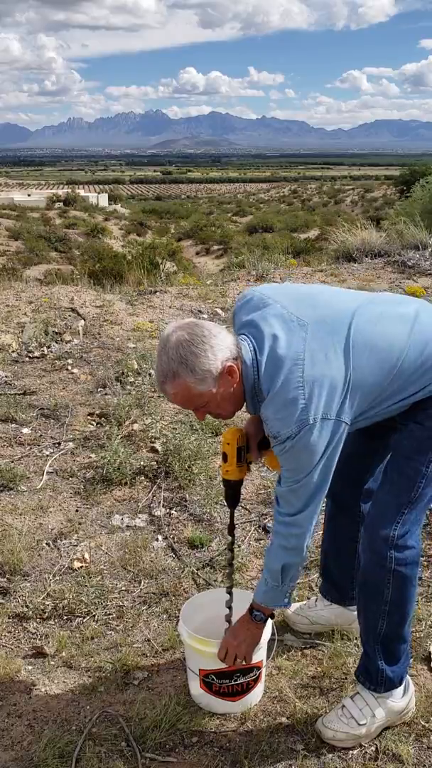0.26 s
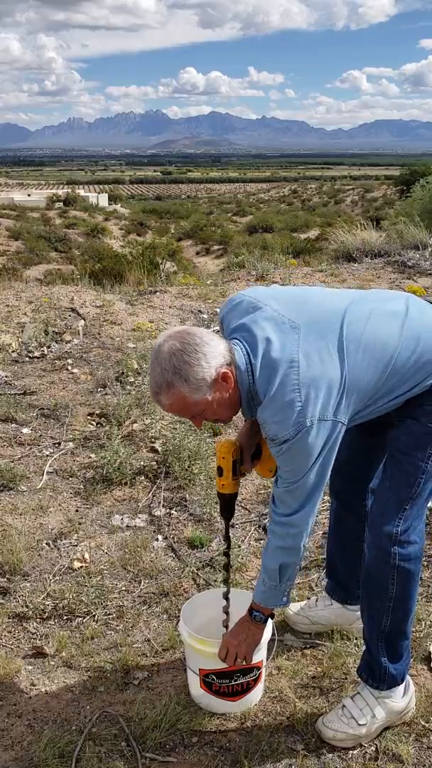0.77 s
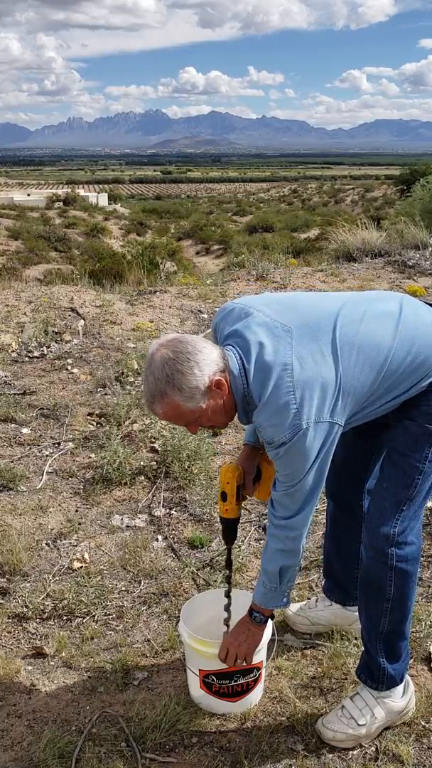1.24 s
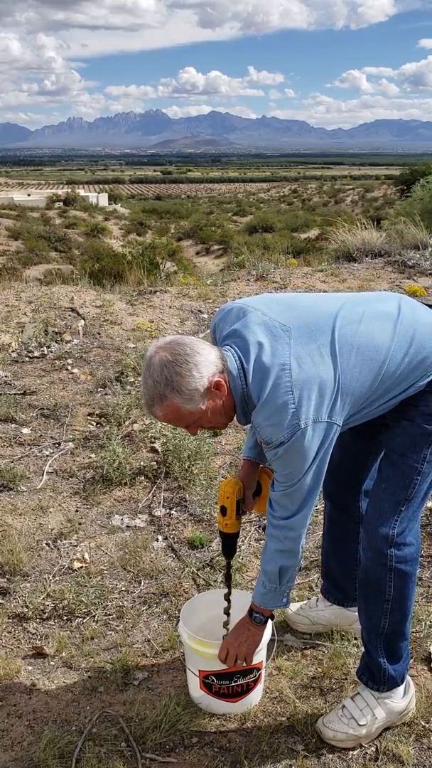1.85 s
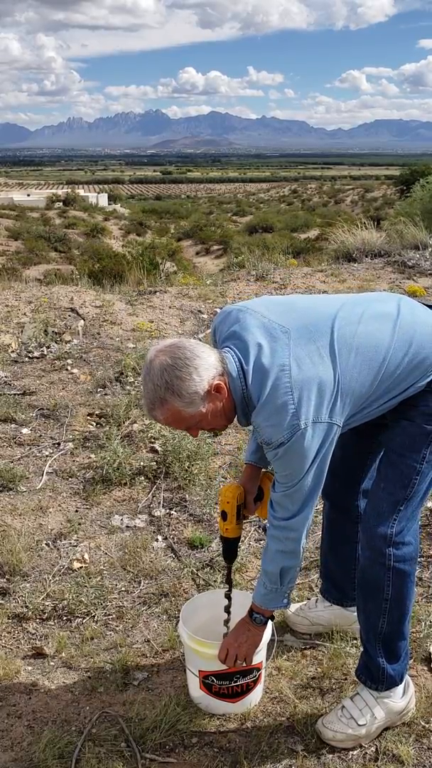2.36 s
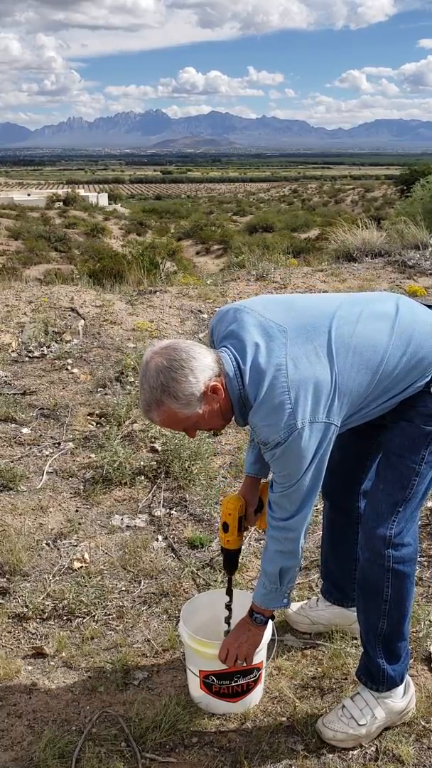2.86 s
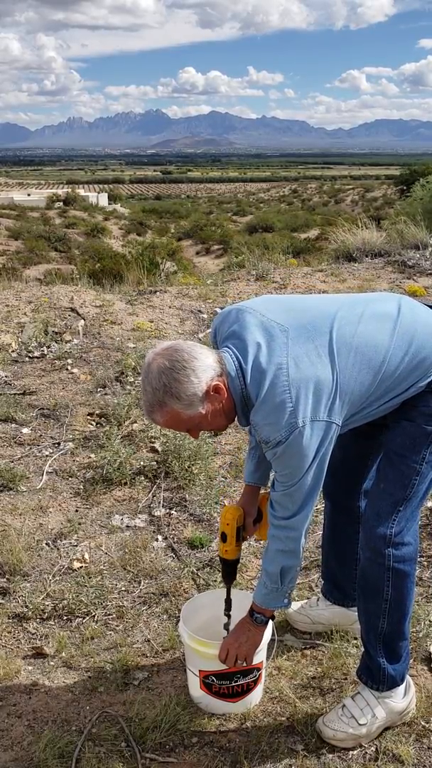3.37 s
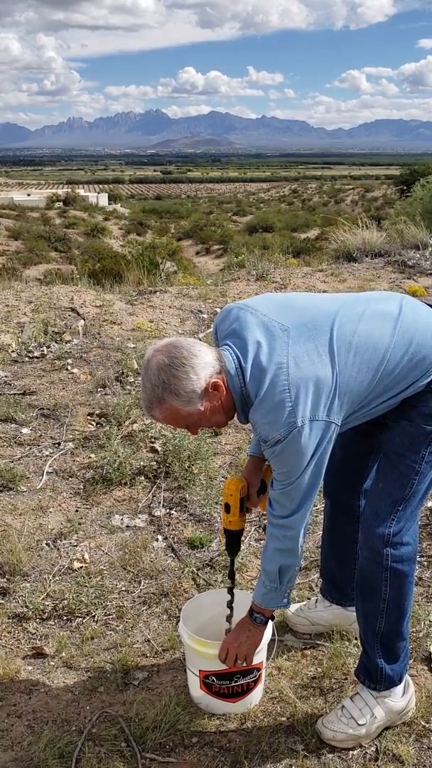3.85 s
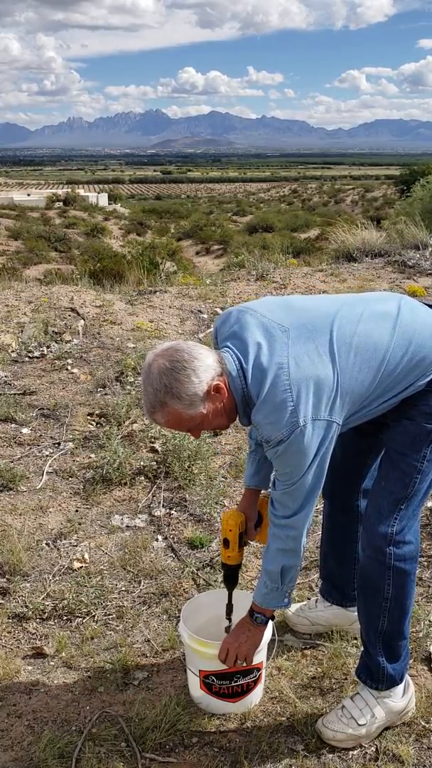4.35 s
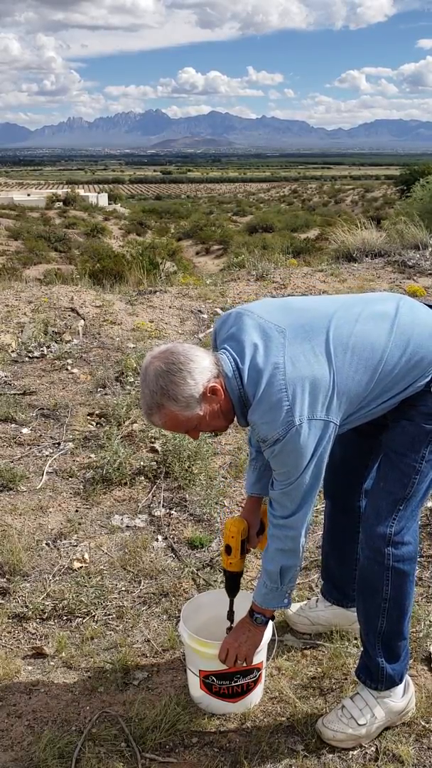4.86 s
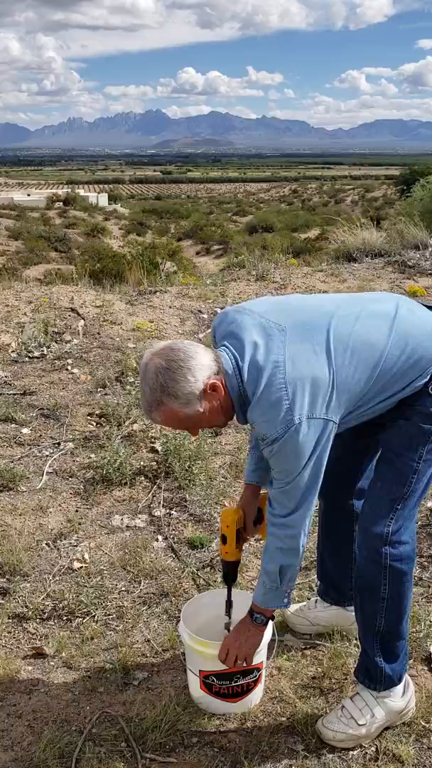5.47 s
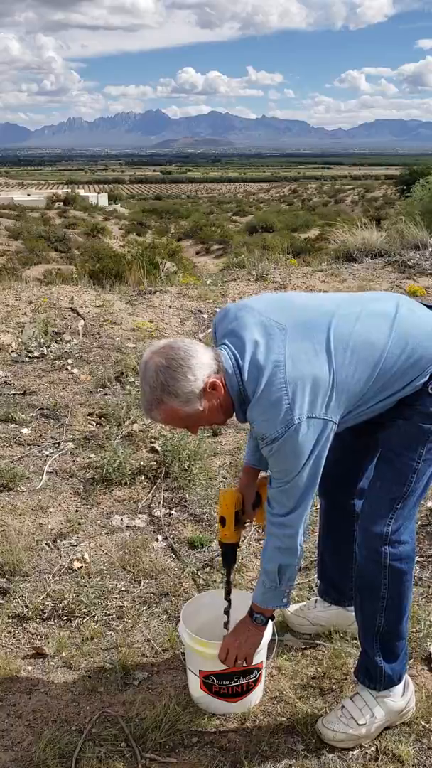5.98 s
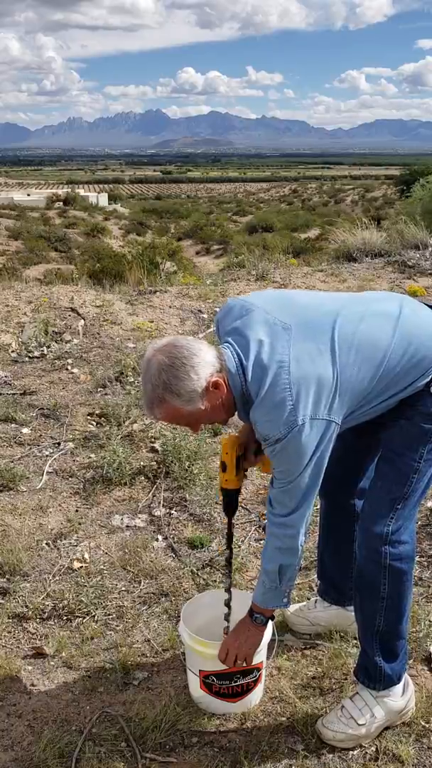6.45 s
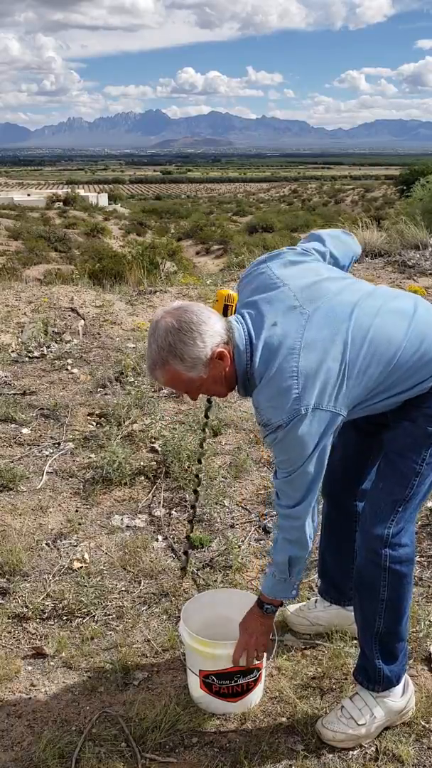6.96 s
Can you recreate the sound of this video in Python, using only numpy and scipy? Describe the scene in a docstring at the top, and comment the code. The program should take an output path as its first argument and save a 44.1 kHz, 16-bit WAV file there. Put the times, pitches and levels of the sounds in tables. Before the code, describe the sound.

A battery drill whines as its long bit scrapes and knocks in a plastic bucket, then stops, in light wind.

```python
"""A light wind and a few soft scrapes are heard first, then a battery drill hisses and whines up to speed.
It turns a long auger bit through a plastic bucket into dry soil, in an open field. The gear tones sag
under load; the flutes scrape and knock the bucket, whose shell rings in its normal modes, and grit pings
off the steel. A brake stops the chuck and the bit is drawn out, while wind buffets both microphone ports."""
import sys
import numpy as np
from scipy import signal
from scipy.fft import rfft, irfft, next_fast_len
from scipy.io import wavfile
from scipy.ndimage import uniform_filter1d, map_coordinates

SR = 44100
rng = np.random.default_rng(int(sys.argv[2]) if len(sys.argv) > 2 else 0)


def dump_mix(stems):
    """Bounce the given channels to the path in sys.argv[1] as a 16-bit WAV at rate SR."""
    frames = np.atleast_2d(stems).T  # one column per channel
    limited = np.clip(frames, -1, 1)  # hard clip at full scale
    pcm = np.round(limited * 32767).astype(np.int16)
    wavfile.write(sys.argv[1], SR, pcm)


N = 318402

# Levels in the tables are relative: the sources apply their own gains.
# far hiss of scrub: (frequency [Hz], spectral density [dB])
SCRUB_SPECTRUM = [(410, -45), (700, -6), (2010, -6), (2830, -2), (3570, -1), (5020, -5.5), (6860, -9.5),
                  (8340, -15.5), (12000, -15), (15800, -24)]
# strength of that hiss: (time [s], level [dB])
SCRUB_LEVEL = [(0, -62.5), (.6, -65), (6.3, -59.5), (7.22, -59)]
# buffeting in a soft breeze: (frequency [Hz], spectral density [dB])
BUFFET_SPECTRUM = [(15, -18), (40, -11), (90, -1.5), (200, -11), (400, -23.5), (700, -44), (1500, -82)]
# strength of the buffeting: (time [s], level [dB])
BUFFET_LEVEL = [(0, -50.5), (.19, -49), (.21, -38.5), (.27, -45), (.3, -47.5), (1.2, -53), (1.85, -39.5),
                (2.2, -42), (2.7, -40), (3.4, -45), (4.4, -46.5), (4.9, -41), (5.5, -51.5), (6.04, -50),
                (6.09, -35.5), (6.15, -48.5), (6.58, -43), (6.62, -35), (6.74, -38), (6.87, -46.5),
                (7.09, -47), (7.16, -42)]

# grit and stones striking the bit: (time [s], level [dB], frequency [Hz])
PINGS = [(1.7704, -18.5, 5560), (2.23, -13, 5280), (3.0727, -23, 5100), (3.8857, -9, 1770),
         (3.9613, -15, 4870), (4.172, -23, 5160), (6.4931, -33.5, 5200), (6.5605, -42, 5300),
         (6.5774, -39.5, 5130)]
# dry rasps of hand, bit and soil: (start [s], peak level [dB], length [ms])
RASPS = [(.122, -55, 75), (.168, -48, 47), (.244, -55, 33), (.378, -54, 16), (.4, -48, 7.9), (.6, -55, 9.8),
         (1.412, -23.5, 16), (6.05, -50, 88), (6.225, -51.5, 200), (6.335, -57, 28), (6.367, -43.5, 41),
         (6.41, -56.5, 130), (6.65, -56, 7.7)]
# colour of the rasps: (frequency [Hz], spectral density [dB])
RASP_SPECTRUM = [(240, -28), (400, -14), (2070, -7.5), (2820, -10.5), (3610, -10), (5060, -6.5),
                 (6180, -12), (7670, -11), (15800, -36.5)]
# trigger, a stone cracking, brake: (start [s], peak level [dB], length [ms])
CLACKS = [(.648, -34, 8.4), (1.444, -16, 11), (6.015, -18.5, 10.6), (6.028, -35, 16)]
# colour of the clacks: (frequency [Hz], spectral density [dB])
CLACK_SPECTRUM = [(300, -16.5), (1500, -10.5), (2800, -4.5), (4000, -5), (7600, -17), (15800, -22)]
# thin notes of the steel bit: (frequency [Hz], bandwidth [Hz], gain [dB])
BIT_MODES = [(6600, 120, -6.5), (7430, 80, 1.5), (7600, 80, -2)]

# air and brush noise of the motor: (frequency [Hz], spectral density [dB])
MOTOR_SPECTRUM = [(1180, -16), (2000, -5), (2340, -7.5), (2660, -5), (3300, -4.5), (3630, -2.5),
                  (3890, -1.5), (5180, -2.5), (6260, -12), (7450, -3.5), (9240, -13.5), (10400, -9),
                  (11400, -11), (12400, -8), (15800, -24)]
# lift of the motor's treble: (time [s], gain [dB])
MOTOR_TREBLE = [(.66, -21), (.69, -4.5), (1.3, -6.5), (1.7, -2), (3.7, 5.5), (3.85, -1), (4.1, 0.5),
                (4.18, 4.5), (5.15, 6.5), (5.4, 0), (5.5, 5.5), (5.8, 6), (6.02, 0.5)]
# gear mesh tone under varying load, at full throttle: (time [s], frequency [Hz], level [dB])
GEAR_MESH = [(.73, 3920, -46), (.765, 3920, -36), (.86, 3920, -39), (.95, 3900, -49), (1.26, 3770, -44),
             (1.36, 3850, -43), (1.6, 3604, -54), (1.8, 3680, -46), (2.06, 3795, -40), (2.22, 3900, -52),
             (2.4, 3895, -50), (2.54, 3770, -42), (2.66, 3825, -41), (2.72, 3735, -43), (3.05, 3780, -50),
             (3.3, 3722, -46), (3.82, 3815, -43), (4.14, 3976, -42), (4.21, 3800, -60), (4.26, 3700, -44),
             (4.34, 3850, -45), (4.7, 3850, -43), (4.88, 3775, -42), (5.1, 3850, -42), (5.36, 4023, -43),
             (5.58, 4048, -53), (5.65, 3930, -47), (5.76, 3990, -50), (5.84, 4025, -39), (5.95, 4025, -46)]
# tones either side of the mesh tone: (time [s], lower level [dB], upper level [dB])
GEAR_SIDEBANDS = [(.9, -60, -60), (1.1, -50, -44), (1.4, -52, -52), (1.8, -42, -49), (2.05, -52, -43),
                  (2.25, -54, -54), (2.45, -47, -41), (2.66, -50, -42), (2.74, -52, -52), (3.2, -45, -45),
                  (3.6, -49, -46), (3.85, -58, -56), (4.6, -54, -56), (4.95, -58, -45), (5.2, -60, -58)]
# weaker gear orders: (multiple of the mesh frequency [1], level against the full-speed mesh tone [dB])
GEAR_ORDERS = [(5 / 12, -8)]

# resonances of the bucket's shell: (frequency [Hz], bandwidth [Hz], gain [dB])
SHELL_MODES = [(310.6, 42, -1), (458, 172, 1), (681, 410, 1.5), (815, 133, 4), (1282, 50, -1),
               (1685, 162, 1), (1900, 202, -2.5), (3030, 80, -15.5)]
# soil grinding between catches: (time [s], level [dB])
GRIND_LEVEL = [(.81, -37.5), (1.15, -34.5), (2.75, -35), (3.3, -37), (4.6, -35.5), (5.8, -37.5),
               (6.17, -53)]
# the flutes catch the bucket: (start [s], peak level [dB], length [ms])
CATCHES = [(0.118,-32.5,14),(.166,-39.5,51),(.388,-48,32),(.47,-51,84),(.809,-33,24),(.855,-37,42),
           (.891,-25,23),(0.958,-17,25),(1,-23.5,51),(1.064,-24.5,60),(1.126,-16.5,33),(1.177,-17,31),(1.234,-17.5,23),
           (1.284,-22,40),(1.34,-19.5,50),(1.402,-15,22),(1.446,-20.5,46),(1.505,-13.5,13),(1.521,-12.5,25),
           (1.56,-22,50),(1.634,-20,10),(1.672,-17.5,48),(1.728,-23,80),(1.781,-20.5,63),(1.849,-15,40),
           (1.901,-18.5,46),(1.955,-23.5,16),(1.977,-27,38),(2.005,-13,24),(2.063,-14,12),(2.11,-17,23),
           (2.155,-25.5,33),(2.209,-17.5,52),(2.291,-20,19),(2.348,-19,42),(2.396,-27,99),(2.443,-22,23),
           (2.485,-16,45),(2.547,-24,73),(2.642,-22,30),(2.7,-15,20),(2.723,-16.5,56),(2.811,-17,30),
           (2.859,-17.5,47),(2.921,-18.5,17.5),(2.959,-23.5,54),(3.03,-14,18),(3.066,-19,28),(3.123,-15,21),(3.167,-24,30),
           (3.219,-21,19),(3.267,-20.5,24),(3.341,-26.5,30),(3.382,-22,47),(3.435,-23.5,65),(3.491,-18,28),
           (3.534,-18.5,36),(3.59,-25,41),(3.655,-28,21),(3.744,-23,48),(3.817,-22.5,35),(3.858,-24,20),(3.88,-15.5,25),
           (3.958,-18,30),(4.006,-21,12),(4.03,-24.5,25),(4.135,-22,43),(4.168,-20.5,38),(4.219,-24.5,18),
           (4.247,-23,26),(4.304,-17.5,19),(4.344,-20,30),(4.386,-20.5,54),(4.442,-30,110),
           (4.569,-24,23),(4.663,-22.5,21),(4.719,-19.5,35),(4.775,-22.5,12),(4.833,-23.5,42),
           (4.912,-22.5,21),(4.998,-25.5,32),(5.029,-27,29),(5.068,-30.5,16),(5.19,-18,21),
           (5.311,-25.5,11),(5.342,-20.5,23),(5.381,-18.5,18),(5.523,-21,19),(5.556,-18,19),(5.618,-23,16),
           (5.643,-23,19),(5.673,-17.5,15),(5.699,-27,28),(5.745,-24.5,13),(5.813,-23.5,15),
           (5.91,-32.5,32),(5.974,-31.5,21),(6.012,-34.5,78),(6.139,-41.5,9),(6.241,-33,17),(6.332,-27.5,30),(6.368,-20,39),
           (6.422,-30,20.3),(6.488,-36,42),(6.558,-39,40),(6.648,-38.5,22)]
# blows that sound the bucket's clearest note: (time of peak [s], peak level [dB], build-up [ms])
KNOCKS = [(0.131, -34, 2.3), (0.183, -47, 9.2), (0.817, -27, 4.1), (0.863, -27.5, 9.1), (0.9, -27, 6.9),
          (0.919, -24.5, 14), (0.973, -12.5, 6.5), (1.149, -15.5, 4.7), (1.195, -25.5, 11),
          (1.209, -16.5, 5), (1.268, -19, 5.7), (1.319, -20.5, 3.4), (1.411, -15, 4.2), (1.462, -19, 5.9),
          (1.49, -22, 16), (1.532, -8, 9), (1.676, -21.5, 1.4), (1.788, -29, 4), (1.817, -23, 11),
          (1.984, -20, 3.7), (2.022, -11, 6.6), (2.071, -20.5, 3.3), (2.131, -18.5, 5.9),
          (2.199, -20.5, 5.4), (2.238, -19, 3), (2.262, -17.5, 2.8), (2.363, -26.5, 5.3),
          (2.411, -16.5, 4.7), (2.46, -14.5, 6.2), (2.506, -15.5, 6.9), (2.553, -20.5, 4.4), (2.57, -16, 4),
          (2.702, -18, 6.9), (2.734, -11, 6), (2.763, -21, 6.3), (2.783, -19, 9.4), (2.869, -15.5, 1.8),
          (2.93, -22, 4.5), (2.974, -19, 2.4), (3.02, -20.5, 4.2), (3.041, -20, 4.4), (3.079, -24.5, 7.6),
          (3.139, -19.5, 4), (3.185, -25.5, 9.7), (3.228, -27, 4.3), (3.507, -17, 3.2), (3.548, -21.5, 3.1),
          (3.893, -16, 2.9), (3.978, -23, 9.7), (4.014, -26, 13), (4.144, -24.5, 4.8), (4.182, -20.5, 3.7),
          (4.229, -22.5, 9.8), (4.312, -17.5, 3.5), (4.353, -19.5, 7), (4.371, -20, 1.8), (4.397, -23, 5.1),
          (4.42, -26.5, 5.7), (4.466, -23.5, 10), (4.591, -26, 8.5), (4.675, -27.5, 4.2), (4.732, -26, 11),
          (5.216, -22, 6.4), (5.536, -25, 2.5), (5.571, -20.5, 10), (5.682, -20.5, 3.3), (5.707, -22, 4.7),
          (5.723, -19, 9.8), (5.825, -19.5, 3.3), (6.039, -35, 7.9), (6.256, -35.5, 1.6),
          (6.348, -35.0, 11), (6.376, -22.5, 3.2), (6.395, -24, 2.3)]

# phase by which the left port leads the right: (frequency [Hz], phase [rad])
PORT_LEAD = [(20, 2.5), (300, -0.2), (1000, -1.03), (2840, -2.5), (4400, -2), (7000, -3.5), (10000, -5),
             (13000, -5.5), (16000, -6)]
# likeness of the two ports: (frequency [Hz], coherence [1])
PORT_COHERENCE = [(200, 0.85), (600, 0.99), (1400, 0.9), (2800, 0.89), (5600, 0.42), (10000, 0.14),
                  (15000, 0.49)]
# left port over right: (frequency [Hz], level difference [dB])
PORT_TILT = [(200, 3), (700, -0.5), (2400, 1.5), (5000, -0.5), (9000, -1), (15000, -3.5)]

STILL_S, SPIN_UP_S, KNEE = .6, .146, 7  # the speed ramps up from rest, then rounds off
TRIGGER_S, ENGAGE_S, RELEASE_S, BRAKE_S = .625, .678, 5.825, 6.02
COAST_PER_S = 1.2  # share of speed lost per second after release
HISS_DB, SINK_DB_PER_S = -29.5, 0.9855  # the motor noise fades as the drill sinks
HISS_GROWS, TONE_GROWS = 0.79, 2  # dB of level per dB of speed
RING_HZ, RING_WIDTH_HZ, RING_T60_S, RING_SPREAD = 965.5, 49, 0.068, 0.015  # the bucket's clearest note
THUD_DB, THUD_DB_PER_MS = 32.5, 1.5  # a slower build-up thuds less
LIFT_MS, LIFT_DEPTH = 16, 0.3  # the scraping eases before a flute catches
BOOM_DB_PER_S = 1  # the lowest shell mode grows as the bit goes deeper
TOP_HZ = 15800
TIME = np.arange(N) / SR


def amp(db):
    """Amplitude ratio of a level in decibels."""
    return 10 ** (np.asarray(db) / 20)


def unit(x):
    """Normalisation to an rms of 1."""
    return x / np.sqrt(np.mean(x ** 2) + 1e-20)


def along(points, hz):
    """Interpolation of (frequency, value) points on a logarithmic frequency axis."""
    f, v = np.transpose(points)
    return np.interp(np.log(hz + 1), np.log(f + 1), v)


def curves(rows):
    """Linear interpolation in time: one curve for each column after the first."""
    s, *cols = np.transpose(rows)
    return [np.interp(TIME, s, c) for c in cols]


def gate(start, stop, fade):
    """Time window: 1 from start to stop, with linear fades outside."""
    return np.clip(np.minimum(TIME - start, stop - TIME) / fade + 1, 0, 1)


def wobble(rate):
    """Random modulation: a spline through `rate` Gaussian knots per second."""
    return map_coordinates(rng.standard_normal(int(N * rate / SR) + 4), [np.arange(N) * rate / SR])


def filtered(x, response):
    """Linear filtering: the spectrum of x times a complex frequency response."""
    m = next_fast_len(N + SR // 2)
    return irfft(rfft(x, m) * response(np.fft.rfftfreq(m, 1 / SR)), m)[..., :N]


def noise(spectrum):
    """Spectral shaping of white noise, at an rms of 1."""
    return unit(filtered(rng.standard_normal(N), lambda hz: amp(along(spectrum, hz))))


def modes(table):
    """Modal superposition: the response of damped resonators, summed with alternating sign."""
    return lambda f: sum((-1) ** k * amp(db) * 1j * f * width / (hz * hz - f * f + 1j * f * width)
                         for k, (hz, width, db) in enumerate(table))


def smeared(x, change, bins, frames):
    """Time-varying filtering: the short-time spectrum times change(smooth random complex field)."""
    spectrum = signal.stft(x, nperseg=256)[2]
    field = rng.standard_normal(spectrum.shape) + 1j * rng.standard_normal(spectrum.shape)
    field = uniform_filter1d(uniform_filter1d(field, bins, axis=0), frames, axis=1)
    return signal.istft(spectrum * change(field / field.real.std()), nperseg=256)[1][:N]


def swells(rows, rise):
    """Superposed envelopes, each a peak on steep-edged shoulders; `rise` is the share that rises."""
    out, ms = np.zeros(N + SR), np.arange(-SR // 50, SR // 6) / SR * 1000
    for s, db, length in rows:
        past_peak = ms - rise * length
        rising = past_peak < 0
        u = abs(past_peak) / np.maximum(np.where(rising, rise, 1 - rise) * length, .3)
        drop_db = np.where(rising, 1.3 * u + 3 * u ** 12, 4.7 * u + 4.5 * u ** 5)
        out[round(s * SR) - SR // 50:][:len(ms)] += amp(db - drop_db)
    return out[:N]


def scrub():
    """Flow noise of distant scrub: a faint hiss, incoherent between the ports."""
    return amp(curves(SCRUB_LEVEL)[0]) * np.array([noise(SCRUB_SPECTRUM), noise(SCRUB_SPECTRUM)])


def wind():
    """Turbulent pressure fluctuations buffet each port separately and grow brighter in gusts."""
    level_db = curves(BUFFET_LEVEL)[0]
    lumps = amp(1.3 * wobble(9) + np.array([4.0 * wobble(24) + 0.57 * wobble(2.98) for _ in "LR"]))
    rumble = np.array([noise(BUFFET_SPECTRUM), noise(BUFFET_SPECTRUM)])
    flap = filtered(rumble, lambda f: 1 / (1 + (230 / (f + 1)) ** 4))
    gust = rumble + flap * (amp(1.1 * (level_db + 48.5)) - 1)
    return amp(level_db + [[4], [2.5]]) * unit(lumps) * gust


def pings():
    """Impact excitation: grit strikes the steel bit, which rings briefly with exponential decay."""
    out, t = np.zeros(N + SR), np.arange(SR // 20) / SR
    for s, db, hz in PINGS:
        envelope = amp(db - 4.5 - 60 * t / 0.065) * (1 - np.exp(-t / 0.00079))
        roughness = 1 + 0.53 * np.repeat(rng.standard_normal(len(t)), 30)[:len(t)]
        out[round(s * SR):][:len(t)] += envelope * roughness * np.sin(2 * np.pi * hz * t)
    return out[:N]


def rasps_and_clacks():
    """Friction and impact give noise bursts, which also excite the bit's modes once it has stopped."""
    rasp = swells(RASPS, rise=.47) * amp(2.5 * wobble(450))
    clack = swells(CLACKS, rise=.33)
    bursts = rasp * noise(RASP_SPECTRUM) + clack * noise(CLACK_SPECTRUM)
    bit_force = amp(13.5) * (rasp + clack) * gate(BRAKE_S, 8, 0.0096) * rng.standard_normal(N)
    return bursts + filtered(bit_force, modes(BIT_MODES))


def throttle():
    """Rotational inertia: the share of full speed through spin-up, and the coast after release."""
    ramp = np.maximum(TIME - STILL_S, 1e-3) / SPIN_UP_S
    coast = np.clip(1 - COAST_PER_S * (TIME - RELEASE_S), .1, 1)
    return (1 + ramp ** -KNEE) ** (-1 / KNEE) * coast


def motor():
    """Broadband air and brush noise, amplitude-modulated by the shaft and a slower gear."""
    mesh_cycles = np.cumsum(curves(GEAR_MESH)[0] * throttle()) / SR
    level_db = HISS_DB - SINK_DB_PER_S * (TIME - TRIGGER_S) + HISS_GROWS * 20 * np.log10(throttle())
    level_db -= 6 * (TIME < ENGAGE_S)  # softer until the gears take up
    throb = 1 + .2 * np.sin(2 * np.pi * mesh_cycles / 12) + .12 * np.sin(2 * np.pi * mesh_cycles / 53)
    air = noise(MOTOR_SPECTRUM) * throb * amp(0.41 * wobble(300))
    # the hiss flickers in random, shifting patches of colour
    air = unit(smeared(air, lambda field: amp(2.17 * field.real), bins=4, frames=27))
    treble = filtered(air, lambda f: (.5 + .5 / (1 + (f / 9000) ** 8)) / (1 + (6400 / (f + 1)) ** 8))
    hiss = air + (amp(curves(MOTOR_TREBLE)[0]) - 1) * treble
    return amp(level_db) * hiss * gate(TRIGGER_S, BRAKE_S, .004)


def gears():
    """Periodic tooth contact radiates a tone at the mesh frequency; modulation adds sidebands."""
    mesh_hz, mesh_db = curves(GEAR_MESH)
    speed_db = TONE_GROWS * 20 * np.log10(throttle())
    lower_db, upper_db = curves(GEAR_SIDEBANDS)
    load_db = (lower_db + upper_db) / 2
    jitter = 1 + .0025 * wobble(45) + .002 * wobble(11)
    phase = 2 * np.pi * np.cumsum(mesh_hz * throttle() * jitter) / SR
    # a loaded gear runs off-centre: sidebands a 21st either side, and the octave grows
    partials = [(1, mesh_db + speed_db),  # the mesh tone follows speed twice as steeply as the rest
                (20 / 21, lower_db), (22 / 21, upper_db), (2, load_db - 3)]
    partials += [(k, mesh_db + db) for k, db in GEAR_ORDERS]
    # uneven teeth blur the mesh
    chatter = amp(load_db + 4.5 + 3.4 * wobble(6.4)) * wobble(420) * np.sin(0.96 * phase)
    whine = sum(amp(db + speed_db + 5 + 3 * wobble(16)) * np.sin(k * phase) for k, db in partials)
    return gate(ENGAGE_S, BRAKE_S, .01) * (chatter + whine)


def scraping():
    """Sliding friction: a gritty force from soil and flutes that dips before each catch, then swells."""
    slips = unit(rng.standard_normal(N) * amp(4 * wobble(700) + 1.5 * wobble(120)))
    grind = amp(curves(GRIND_LEVEL)[0] + 10 + 2.1 * wobble(38))
    grind *= gate(GRIND_LEVEL[0][0], GRIND_LEVEL[-1][0], 0.0035)
    contact, n = np.ones(N), round(LIFT_MS * SR / 1000)
    for s, *_ in CATCHES:
        contact[round(s * SR) - n:round(s * SR)] = 1 - LIFT_DEPTH * np.hanning(2 * n)[:n]
    return slips * contact * (grind + amp(7) * swells(CATCHES, rise=.19))


def knocks():
    """Damped vibration: blows build up the clear note, which decays. Returns it and the impulses."""
    note, impulses, t = np.zeros(N + SR), np.zeros(N), np.arange(-SR // 50, SR // 10) / SR
    for (s, db, ms), (detune, phase) in zip(KNOCKS, rng.standard_normal((len(KNOCKS), 2))):
        rise = np.cos(np.pi / 2 * np.clip(-t * 1000 / ms, 0, 1)) ** 2
        decay = amp(db - 60 * np.maximum(t, 0) / RING_T60_S)
        ring = np.sin(2 * np.pi * RING_HZ * (1 + RING_SPREAD * detune) * t + 9 * phase)
        note[round(s * SR) - SR // 50:][:len(t)] += rise * decay * ring
        impulses[round((s - .7 * ms / 1000) * SR)] = amp(db + THUD_DB - THUD_DB_PER_MS * ms) * np.sign(phase)
    rattle = amp(2.2 * wobble(160) - 1.0)  # grit rubbing the shell shakes the note
    return note[:N] * rattle, impulses


def bucket():
    """Forced vibration: the flutes' friction and sharp blows drive the normal modes of the shell."""
    friction = scraping()
    note, impulses = knocks()
    for s, db, _ in CATCHES:  # the first touch of a flute is a tap
        impulses[round((s + .003) * SR)] += amp(db + 22.0 + rng.normal(0, 2.6))
    force = friction + impulses
    shell = filtered(force, modes(SHELL_MODES))
    boom = filtered((amp(BOOM_DB_PER_S * TIME) - 1) * force, modes(SHELL_MODES[:1]))
    rubbed_note = filtered(friction, modes([(RING_HZ, RING_WIDTH_HZ, 6.5)]))
    return note + shell + boom + rubbed_note


def ports(contacts, hiss_pair, tones):
    """Multipath interference: shifting paths off ground and body make the ports differ in the treble."""
    def split(hz):
        angle = np.arccos(along(PORT_COHERENCE, hz)) / 2
        return np.array([np.cos(angle), np.sin(angle)])

    def lead_and_tilt(hz):
        left = np.exp(1j * along(PORT_LEAD, hz) / 2) * amp(along(PORT_TILT, hz) / 2)
        return np.array([left, 1 / left])

    scattered = smeared(contacts, lambda field: field / abs(field), bins=8, frames=40)  # random phase
    direct, reflected = filtered(hiss_pair + np.array([contacts, scattered]), split)
    return filtered(tones + np.array([direct + reflected, direct - reflected]), lead_and_tilt)


def scene():
    """Superposition of the drilling, the wind and the far hiss at the two ports."""
    contacts = bucket() + pings() + rasps_and_clacks()
    drilling = ports(contacts, np.array([motor(), motor()]), gears())
    return drilling + wind() + scrub()


def record(dry):
    """Band limiting: an ideal low-pass filter passes nothing above TOP_HZ."""
    return filtered(dry, lambda hz: hz < TOP_HZ)


dry = scene()
out = record(dry)
dump_mix(out)
```